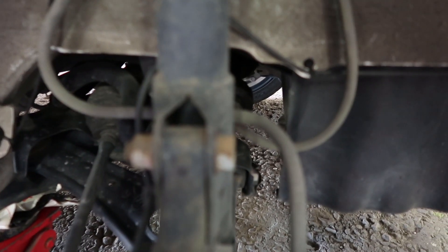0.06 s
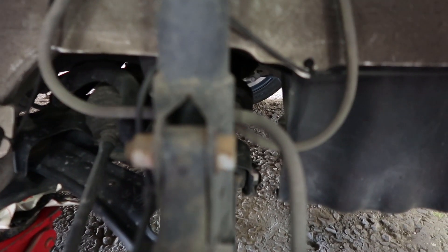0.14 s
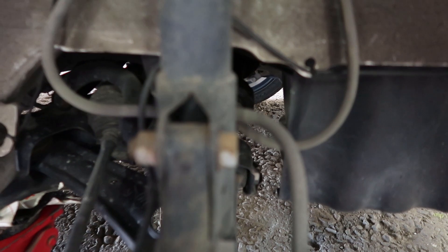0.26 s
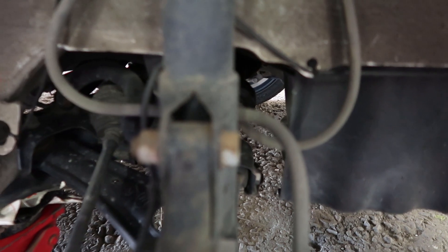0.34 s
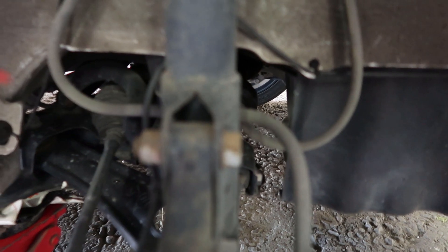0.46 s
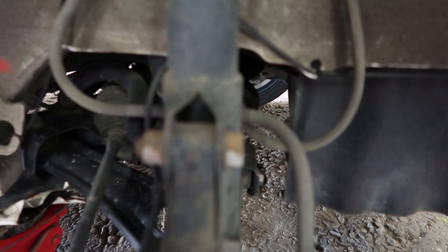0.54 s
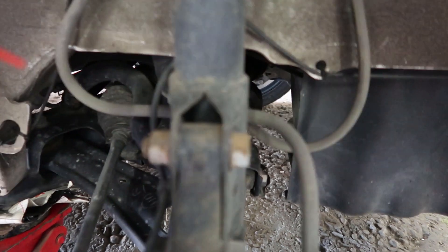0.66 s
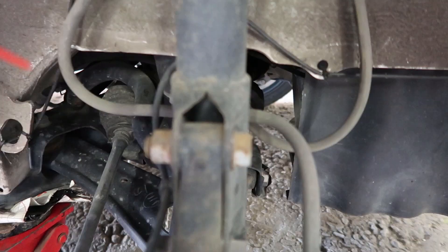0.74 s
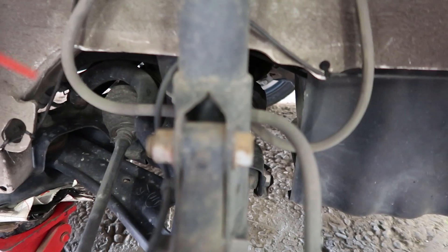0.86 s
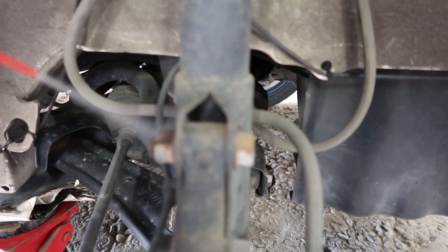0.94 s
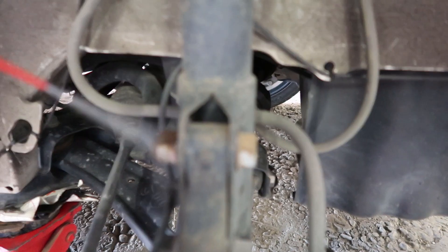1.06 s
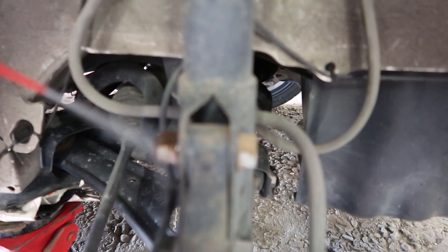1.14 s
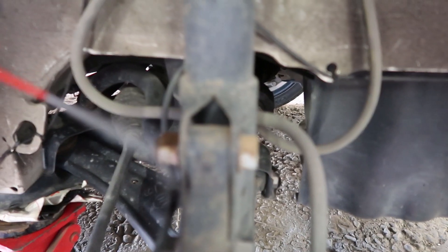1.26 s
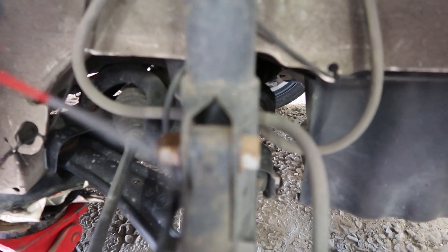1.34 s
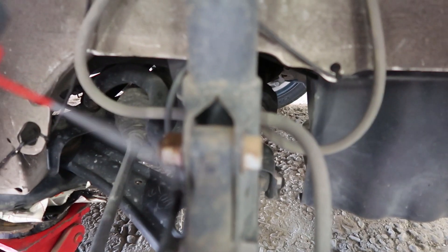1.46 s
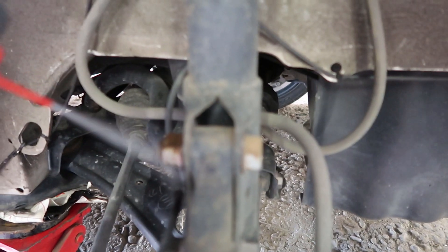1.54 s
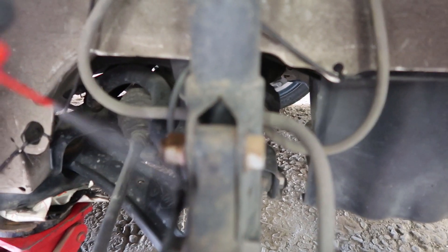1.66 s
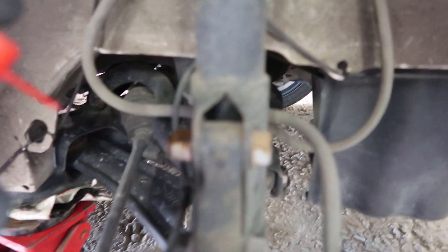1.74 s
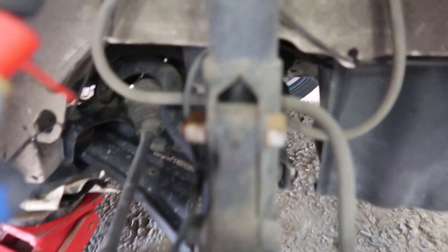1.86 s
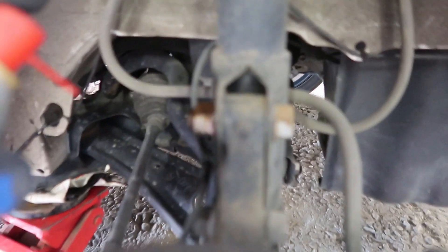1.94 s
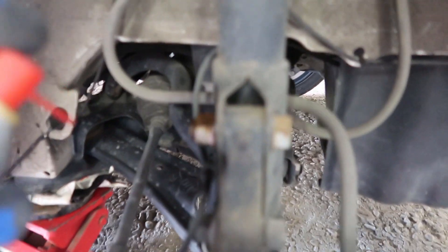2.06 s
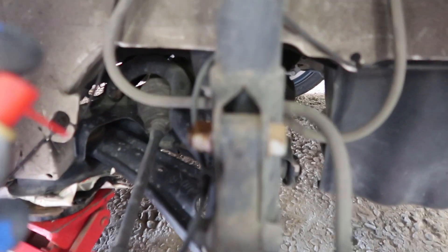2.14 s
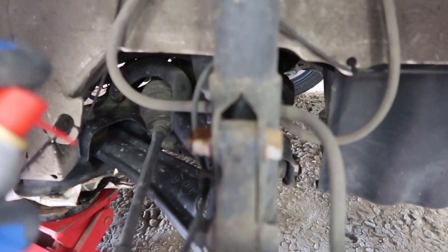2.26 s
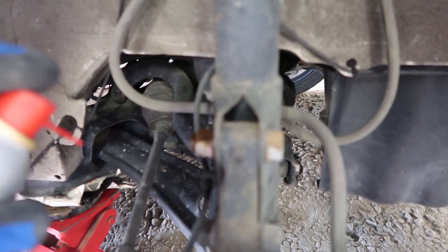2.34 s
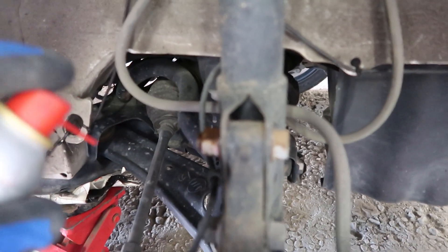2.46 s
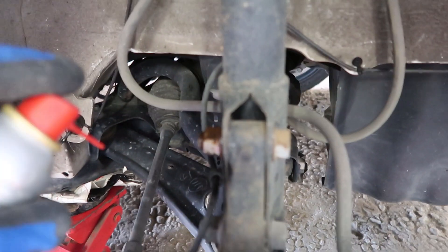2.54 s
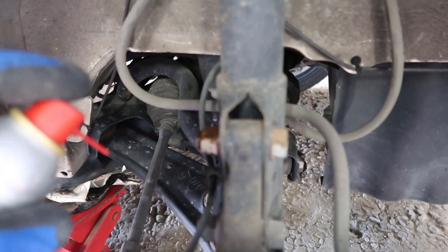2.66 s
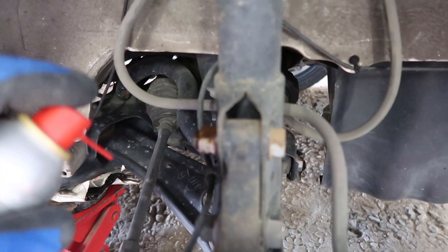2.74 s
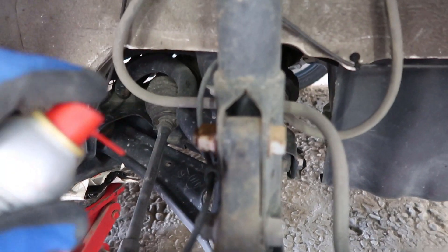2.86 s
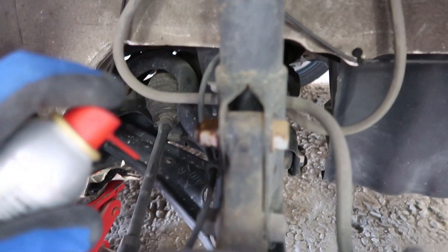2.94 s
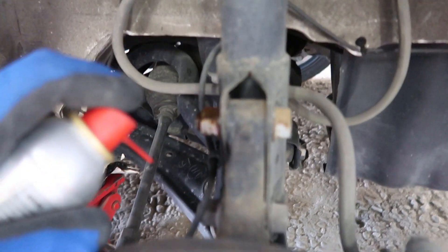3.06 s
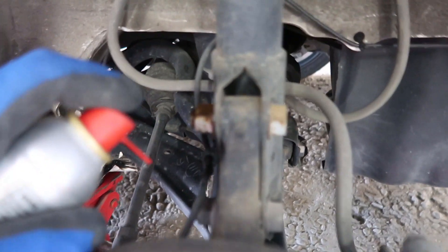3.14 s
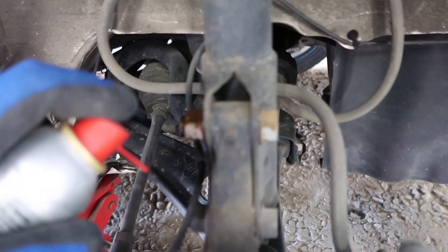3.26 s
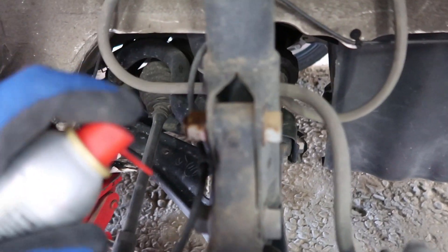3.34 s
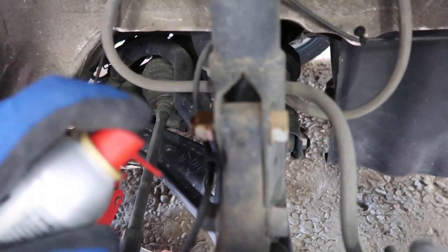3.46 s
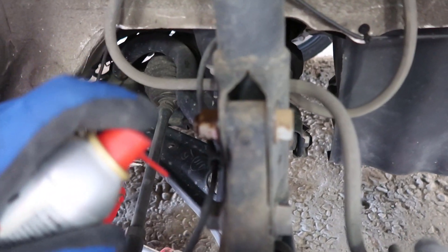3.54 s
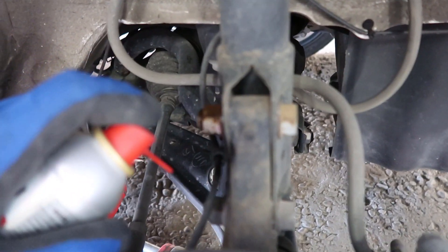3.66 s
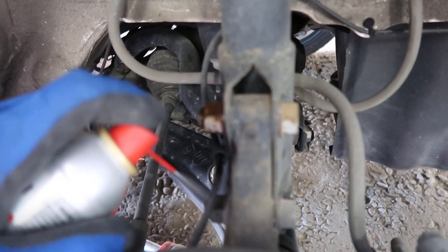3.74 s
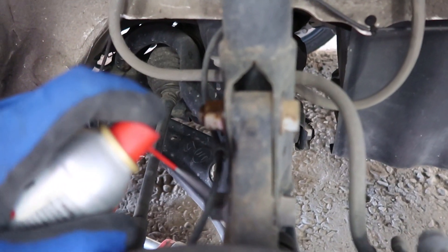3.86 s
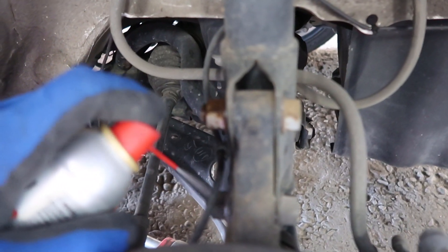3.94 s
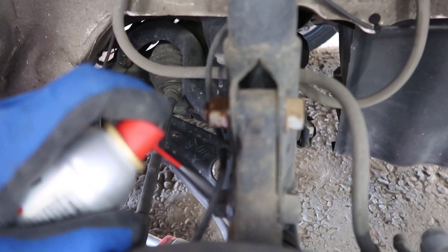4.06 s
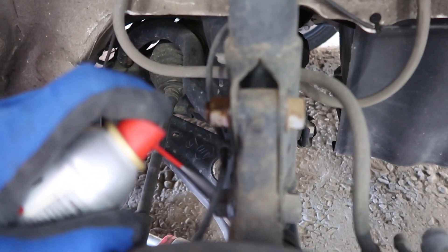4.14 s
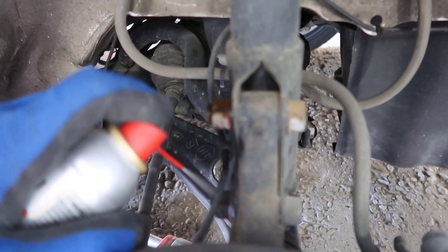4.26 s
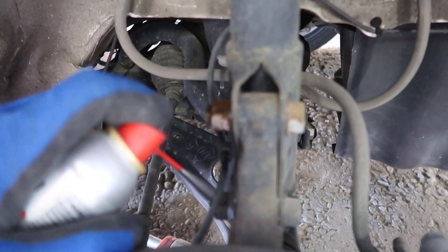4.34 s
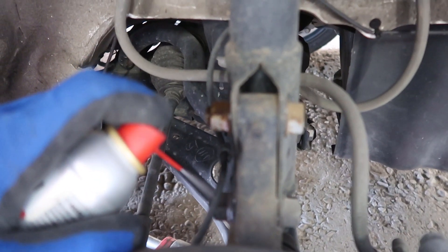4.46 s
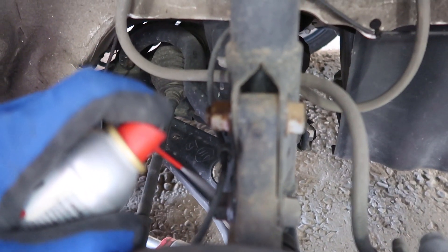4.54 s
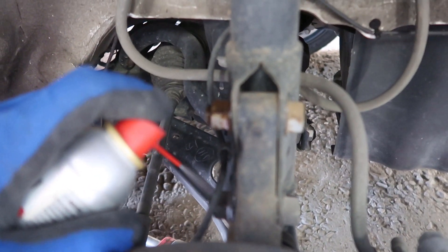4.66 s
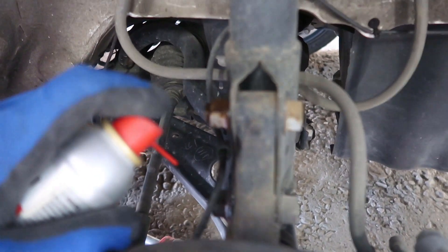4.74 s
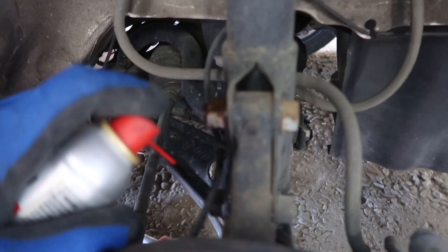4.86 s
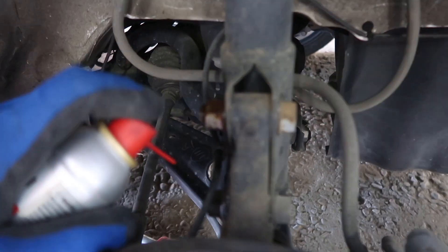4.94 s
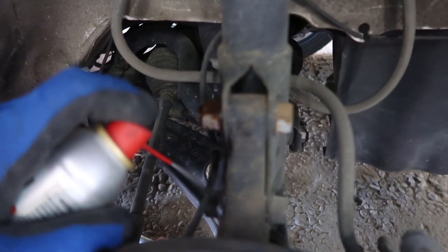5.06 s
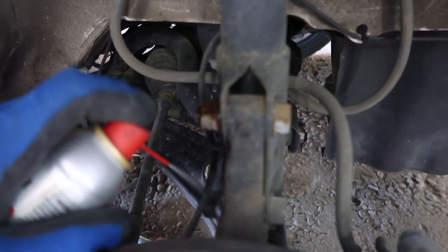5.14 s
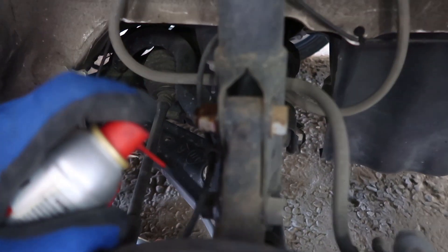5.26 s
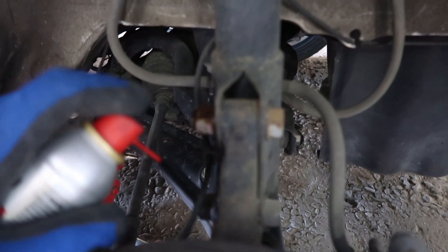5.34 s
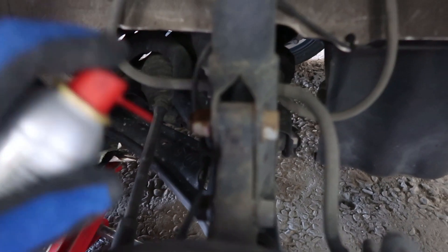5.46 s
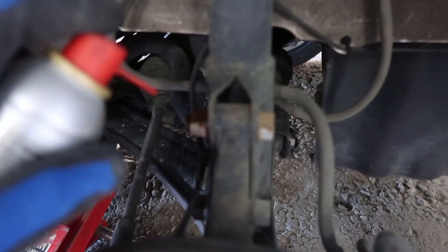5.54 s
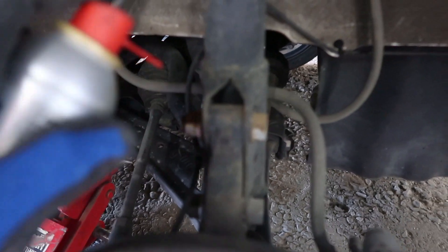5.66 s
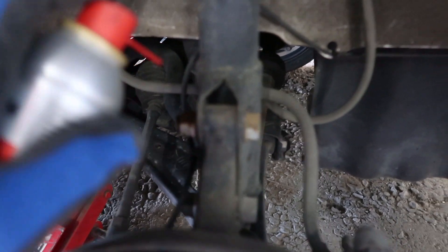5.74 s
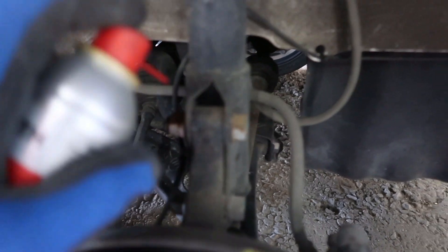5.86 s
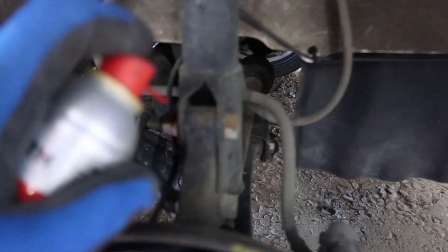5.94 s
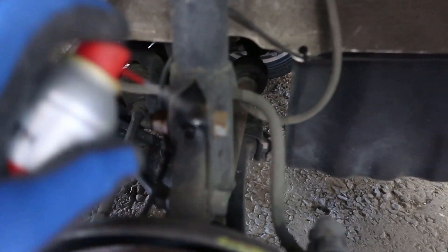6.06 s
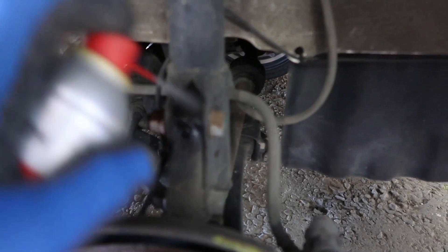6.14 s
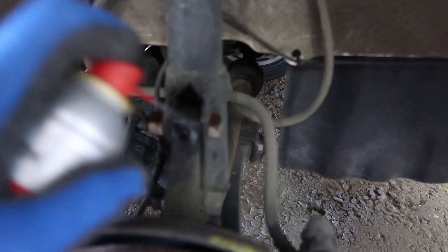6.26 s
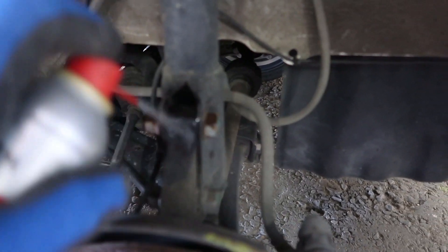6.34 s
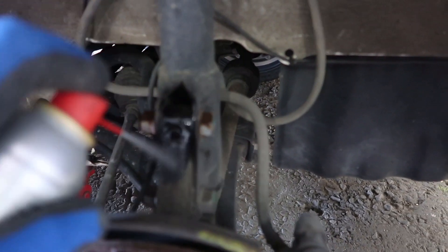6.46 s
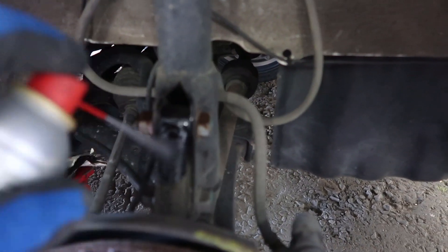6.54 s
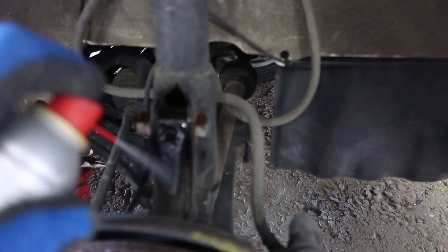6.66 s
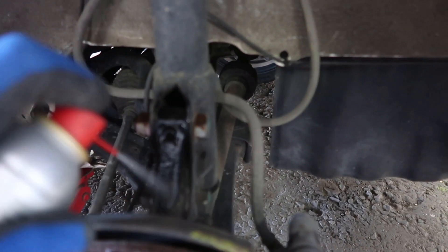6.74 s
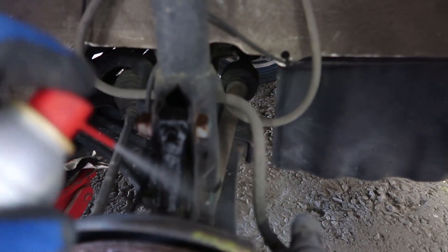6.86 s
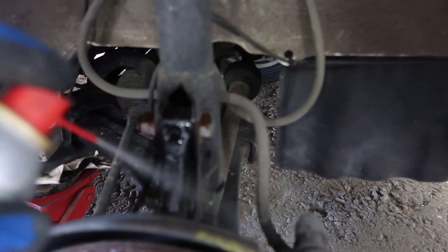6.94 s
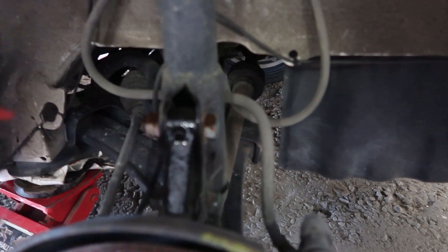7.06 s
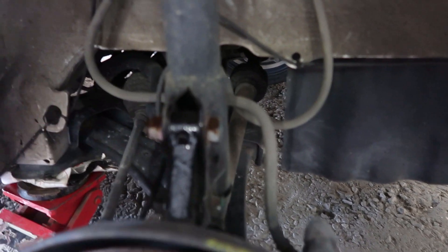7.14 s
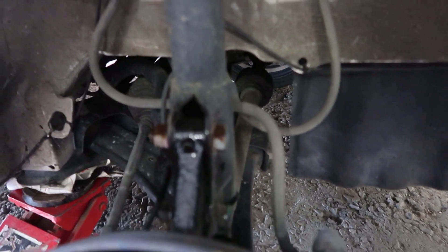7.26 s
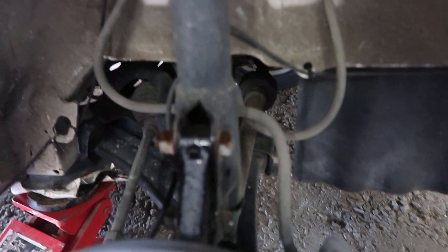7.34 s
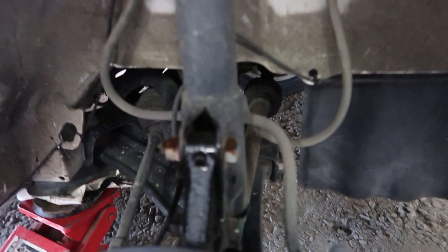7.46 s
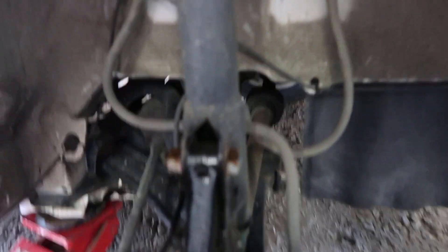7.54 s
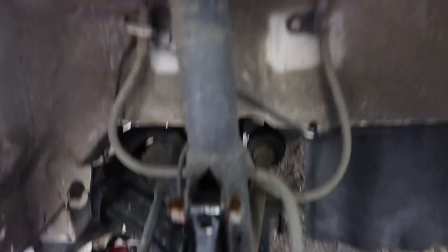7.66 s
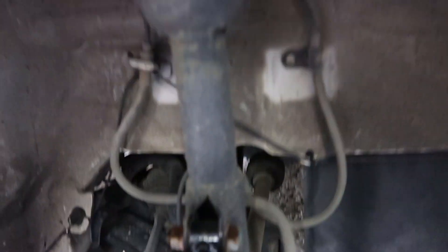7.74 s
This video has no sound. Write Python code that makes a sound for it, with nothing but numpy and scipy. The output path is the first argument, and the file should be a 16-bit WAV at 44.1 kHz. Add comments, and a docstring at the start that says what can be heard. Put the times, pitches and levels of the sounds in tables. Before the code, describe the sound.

A quiet outdoor or garage background runs throughout: a distant machine's low drone and wavering hum, a soft airy wash and a barely audible thin high whine. A small tick at 0.5 s precedes the first aerosol press at about 0.6 s; it starts as thin gas with brief high whistles, then fills by 1 s into a bright, wet hiss splashing on metal until 1.8 s. Background alone follows, with light can clicks at 3.2 and 3.7 s. A second steady spray, with a hollow resonance, lasts from 3.8 to 4.85 s. A short squirt comes at 5.1-5.4 s. A glove scrapes and scuffs on the can around 5.6-5.9 s. The last spray, 6.1-7.15 s, is uneven, dipping near 6.3 s and changing colour as the aim moves down the strut. Faint ticks and soft rubbing close it from 7.4 to 7.8 s. Close, dry stereo.

```python
"""An aerosol can with a straw sprays a car's suspension strut in four bursts, heard close by in the wheel arch.
Turbulence noise hisses in the jet and splashes on the metal, whose resonances colour it anew at each aim.
The valve whistles as narrow-band noise, the nozzle ticks and rings the can's modes, and a glove scrapes on it
between bursts. Behind, shaped noise makes a distant machine's drone, hum and rumble, a wash and a thin whine."""
import sys
import numpy as np
from scipy import signal
from scipy.fft import rfft, irfft, next_fast_len
from scipy.io import wavfile
from scipy.ndimage import uniform_filter1d, map_coordinates

SR = 44100
rng = np.random.default_rng(int(sys.argv[2]) if len(sys.argv) > 2 else 0)


def dump_mix(stems):
    """Bounce the given channels to the path in sys.argv[1] as a 16-bit WAV at rate SR."""
    frames = np.atleast_2d(stems).T  # one column per channel
    limited = np.clip(frames, -1, 1)  # hard clip at full scale
    pcm = np.round(limited * 32767).astype(np.int16)
    wavfile.write(sys.argv[1], SR, pcm)


N = 344421


def amp(db):
    """Logarithmic level: decibels to amplitude gain."""
    return 10 ** (np.asarray(db) / 20)


def unit(x):
    """Normalisation: x at rms 1."""
    return x / np.sqrt(np.mean(x ** 2) + 1e-20)


def clock():
    """Sampling: the time of each sample in seconds."""
    return np.arange(N) / SR


def along(points, hz):
    """Spectral envelope: (f/Hz, value) points read on a logarithmic frequency axis."""
    f, value = np.transpose(points)
    return np.interp(np.log(hz + 1), np.log(f + 1), value)


def level_curve(points, t):
    """Temporal envelope: (t/s, level/dB) points joined by straight lines."""
    s, level = np.transpose(points)
    return np.interp(t, s, level)


def swells(rows, t):
    """Superposition: the sum of Gaussian bumps (t/s, spread/s, level/dB)."""
    return sum(db * np.exp(-((t - s) / spread) ** 2 / 2) for s, spread, db in rows)


def wobble(rate, t):
    """Slow random modulation: a smooth curve with rate random knots a second."""
    knot = (t - t[0]) * rate
    return map_coordinates(rng.standard_normal(int(knot[-1]) + 4), [knot])


def filtered(x, response):
    """Linear filtering: x times a response of frequency, with padding against wrap-around."""
    n = x.shape[-1]
    m = next_fast_len(n + 4096)
    return irfft(rfft(x, m) * response(np.fft.rfftfreq(m, 1 / SR)), m)[..., :n]


def bell(hz, centre, width):
    """Resonance: a curve of height 1, width Hz across at half height."""
    return 1 / (1 + (2 * (hz - centre) / width) ** 2)


def band_unit(x, lo, hi):
    """Band level: a stereo pair scaled so that its centre has rms 1 between lo and hi Hz."""
    centre = x.mean(0)
    return x / np.std(filtered(centre, lambda hz: (hz > lo) & (hz < hi)))


def noise_pair(t, patchy_db):
    """Non-stationary noise: two unrelated noises with drifting time-frequency patches of gain."""
    cells = signal.stft(rng.standard_normal((2, len(t))), nperseg=512)[2]
    field = uniform_filter1d(rng.standard_normal(cells.shape), size=3, axis=1)
    field = uniform_filter1d(field, size=22, axis=2)
    return signal.istft(cells * amp(patchy_db * unit(field)), nperseg=512)[1][:, :len(t)]


def narrow(t, pitch_hz, width_hz, phase):
    """Narrow-band noise: slow noise modulates a carrier, with a phase step in radians between the ports.
    Its amplitude response has halved width_hz to either side of the pitch."""
    a, b = filtered(rng.standard_normal((2, len(t))), lambda hz: bell(hz, 0, width_hz * 2))
    carrier = 2 * np.pi * np.cumsum(pitch_hz * np.ones(len(t))) / SR
    turn = carrier + np.array([[phase], [-phase]]) / 2
    return unit(a * np.cos(turn) + b * np.sin(turn))


# coherence of a diffuse field between the two ports: f/Hz, left-right likeness (-1 to 1)
COHERENCE = [(30, .965), (70, .992), (160, .988), (350, .89), (1200, .88), (2200, .45), (3500, .1),
             (8000, 0), (14000, -.3)]


def diffuse(spectrum, patchy_db):
    """Diffuse field: stereo noise, alike in the bass and unrelated or opposed in the treble; its mid has rms 1."""
    def mid_and_side(hz):
        turn = np.arccos(np.clip(along(COHERENCE, hz), -1, 1)) / 2
        return amp(along(spectrum, hz)) * [np.cos(turn), np.sin(turn)]

    mid, side = filtered(noise_pair(clock(), patchy_db), mid_and_side)
    return np.array([mid + side, mid - side]) / np.std(mid)


# spectrum of the machine's low drone: f/Hz, level/dB
DRONE_SPECTRUM = [(12, -50), (20, -23), (75, 10), (91, 9.5), (113, 4), (130, -12), (170, -35), (290, -120)]
# its level in time: t/s, level/dB
DRONE_LEVEL_CURVE = [(0, -47.5), (0.75, -43.5), (1.35, -45), (1.6, -59), (2.45, -48.2), (3.1, -57),
                     (6.6, -59), (7.0, -46.5), (7.81, -46)]


def drone():
    """Band-limited noise with a narrow-band overtone: the distant machine's drone, rising and falling."""
    t = clock()
    overtone = amp(-5) * narrow(t, 155, width_hz=21, phase=0)
    return amp(level_curve(DRONE_LEVEL_CURVE, t)) * (diffuse(DRONE_SPECTRUM, patchy_db=-1.2) + overtone)


# spectrum of the rumble: f/Hz, level/dB
RUMBLE_SPECTRUM = [(62, -52), (105, -5), (151, 1.5), (183, -2.5), (232, 0.5), (286, -3), (345, -12.5),
                   (380, -19), (490, -32), (840, -120)]
# its level in time: t/s, level/dB
RUMBLE_LEVEL_CURVE = [(0, -43.5), (3.5, -46.5), (4.2, -47), (5.4, -48), (6.1, -44.5), (7.81, -47)]


def rumble():
    """Shaped diffuse noise: the machine's rumble, slowly varying in level."""
    return amp(level_curve(RUMBLE_LEVEL_CURVE, clock())) * diffuse(RUMBLE_SPECTRUM, patchy_db=-0.1)


# wavering tones of the machine: f/Hz, level/dB, half width/Hz
HUM_TONES = [(83.1, -53, 17), (160, -52.5, 27), (221.4, -53, 16), (926, -62, 17)]


def hum():
    """Narrow-band noise: tones whose finite bandwidth makes them waver."""
    t = clock()
    return sum(amp(db) * narrow(t, hz, width, phase=0) for hz, db, width in HUM_TONES)


# spectrum of the outdoor wash: f/Hz, level/dB
WASH_SPECTRUM = [(190, -26), (330, -12), (400, -5.5), (518, -0.5), (692, -7), (813, -5), (896, -8),
                 (971, -5), (1200, -5.5), (2000, -17.5), (3470, -22.5), (7630, -31.5), (12800, -37),
                 (14500, -46), (15500, -60)]
# level of the wash below its treble: t/s, level/dB
WASH_LEVEL_CURVE = [(0, -51.5), (0.5, -52), (1.9, -47.5), (2.6, -46), (3.2, -49.5), (3.7, -50),
                    (4.95, -50.5), (7.81, -50)]


def wash():
    """Spectral tilt with level: an outdoor wash of diffuse noise that swells mostly below the treble."""
    air = diffuse(WASH_SPECTRUM, patchy_db=1.0)
    body = filtered(air, lambda hz: 1 / (1 + (hz / 1600) ** 8))
    body_db = level_curve(WASH_LEVEL_CURVE, clock())
    treble_db = -49.0 + 0.29 * (body_db - body_db.mean())
    return amp(body_db) * body + amp(treble_db) * (air - body)


def whine():
    """Narrow-band noise: a thin, faint high tone."""
    return amp(-77.5) * narrow(clock(), 13010, width_hz=45, phase=2.0)


def garage():
    """Superposition of the background sources."""
    return drone() + rumble() + hum() + wash() + whine()


# spectrum of the glove's scrape: f/Hz, level/dB
SCRAPE_SPECTRUM = [(880, -41), (1500, -10), (3000, -4.5), (3890, -11), (4410, -14), (5670, -14),
                   (13000, -20), (15000, -31)]
# spectrum of the dull scuff under a hard grip: f/Hz, level/dB
SCUFF_SPECTRUM = [(900, -28), (1700, -2), (2300, 0), (3500, 0), (4500, -9), (6000, -18), (9000, -30)]
# strokes of the glove on the can: t/s, length/s, level/dB, scuff against the scrape/dB
GLOVE_STROKES = [(5.568, 0.22, -58.5, -16), (5.659, 0.015, -58.5, 9), (5.705, 0.025, -56.5, 6),
                 (5.745, 0.03, -56, 5.5), (5.832, 0.061, -59, -6), (7.37, 0.12, -65.5, -14),
                 (7.52, 0.26, -61.5, -14)]
GRIP_S, SLIP_S = 0.0099, 0.008  # linear rise and exponential decay time of a stroke


def glove():
    """Friction noise: the glove scrapes in short, uneven strokes; a hard grip adds a dull scuff."""
    t = clock()
    scrape, scuff = np.zeros(N), np.zeros(N)
    for s, length, db, scuff_db in GLOVE_STROKES:
        rise = np.clip((t - s) / GRIP_S, 0, 1)
        stroke = amp(db) * rise * np.exp(-np.maximum(t - s - length, 0) / SLIP_S)
        scrape += stroke
        scuff += stroke * amp(scuff_db)
    unevenness = amp(1.2 * wobble(130, t))
    scrape_sound = scrape * diffuse(SCRAPE_SPECTRUM, patchy_db=4.5)
    scuff_sound = scuff * diffuse(SCUFF_SPECTRUM, patchy_db=0.5)
    return unevenness * (scrape_sound + scuff_sound)


# the can's modes: f/Hz, level touched on the wall/dB, level touched on the rim/dB, t60/s
CAN_MODES = [(1910, -1, -14, 0.12), (3460, 0.5, -13, 0.25), (4167, -12, -1, 0.4), (4525, 0.5, -14, 0.32),
             (5350, 1, -1, 0.23), (5680, -8, -10, 0.19), (6089, -11, -12, 0.2), (7284, -12, 1, 0.1),
             (8245, -3, -12, .15)]
# ticks of the nozzle and can: t/s, level/dB, centre f/Hz, t60/s, ring level against the tick/dB,
# place touched (0 wall to 1 rim), treble level/dB
NOZZLE_TICKS = [(0.470, -48, 4400, 0.018, -26, 0, -30), (3.235, -46, 3900, 0.15, -10, 0, -8),
                (3.657, -55, 4800, .16, -8, 1, -9), (5.064, -43, 6000, .05, -18, 0, -10),
                (7.408, -54, 2600, .09, -20, 0, -22), (7.535, -57, 4400, 0.11, -17, 0, -16),
                (7.668, -55, 10000, .03, -20, 0, -17), (7.748, -44, 5660, 0.033, -22, 0, -28)]


def ticks():
    """Modal excitation: each tick rings the can faintly; the place touched decides which modes speak."""
    out = np.zeros((2, N))
    age = np.arange(SR // 4) / SR
    for s, db, centre, t60, ring_db, rim, treble_db in NOZZLE_TICKS:
        def colour(hz):
            main = bell(hz, centre, centre * 0.68) * hz / (hz + 900)
            return main + amp(treble_db) * bell(hz, 11400, 4000)

        tick = unit(filtered(rng.standard_normal((2, len(age))), colour))
        # each mode starts at a random phase, slightly different at the two ports
        phases = rng.uniform(0, 2 * np.pi, (len(CAN_MODES), 1, 1)) + rng.normal(0, 0.45, (len(CAN_MODES), 2, 1))
        ring = np.zeros((2, len(age)))
        for (hz, wall_db, rim_db, mode_t60), phase in zip(CAN_MODES, phases):
            mode_db = wall_db + rim * (rim_db - wall_db) - 60 * age / mode_t60
            ring += amp(mode_db) * np.sin(2 * np.pi * hz * age + phase)
        onset = 1 - np.exp(-age / (0.028 * t60))
        sound = amp(db) * onset * (tick * amp(-60 * age / t60) + amp(ring_db) * ring)
        place = out[:, round(s * SR):][:, :len(age)]
        place += sound[:, :place.shape[1]]
    return out


ATTACK_S = 0.021  # the straw fills
# brief whistles of the valve: t/s, spread/s, f/Hz, half width/Hz, level/dB, phase between ports/rad
VALVE_WHISTLES = [(0.63, 0.04, 3830, 281, -47, 1.0), (0.73, 0.085, 4500, 430, -44, 0.83),
                  (0.72, 0.053, 5630, 120, -48.5, 0.6), (0.838, 0.023, 7630, 290, -33.5, 1),
                  (0.73, 0.078, 7500, 420, -44, 1.2), (5.42, 0.03, 5770, 90, -53, 1.06),
                  (6.14, 0.033, 7880, 161, -43, 2.8)]


def whistles():
    """Flow-excited narrow-band noise: the valve sings briefly, faded in over ATTACK_S up to its cracking."""
    t = clock()
    out = np.zeros((2, N))
    for s, spread, hz, width, db, phase in VALVE_WHISTLES:
        cracks = max(press[0] for press in VALVE_PRESSES if press[0] < s + spread)
        opened = np.clip((t - cracks) / ATTACK_S + 1, 0, 1)
        swell = np.exp(-((t - s) / spread) ** 2 / 2) * opened
        out += amp(db) * swell * narrow(t, hz, width, phase)
    return out


CRACK_DB, SEAT_DB = -10, -12  # flow as the valve cracks open and just before it seats, against full flow
# the finger falters or bears down: t/s, spread/s, flow level/dB
FINGER_FALTERS = [(0.83, 0.024, 1.5), (0.912, 0.031, -4), (3.85, 0.025, -1.5), (5.11, 0.025, 1),
                  (6.15, 0.018, 0), (6.3, 0.071, -5), (7.135, 0.018, -1)]


def valve(t, cracks, full, eases, shuts, empties):
    """Flow control: the valve cracks, opens, holds, eases and shuts; returns flow in dB and the straw's gate."""
    flow_db = np.interp(t, [cracks, full, eases, shuts], [CRACK_DB, 0, 0, SEAT_DB])
    flow_db = flow_db + swells(FINGER_FALTERS, t)
    filling = np.clip((t - cracks) / ATTACK_S + .5, 0, 1)
    emptying = amp(-40 * np.maximum(t - shuts, 0) / empties)
    return flow_db, filling * emptying


FIRST_BOUNCE_S = 0.003  # delay of the nearest wall's answer


def near_walls(source, t, t60, drift, count=5):
    """Multiple reflection: many short bounces on two outputs; their mix drifts with drift knots a second."""
    age = np.arange(SR // 20) / SR
    decay = amp(-60 * age / t60) * (age > FIRST_BOUNCE_S)
    paths = rng.standard_normal((count, 2, len(age))) * decay
    paths /= np.linalg.norm(paths, axis=2, keepdims=True)
    weights = np.array([wobble(drift, t) for _ in range(count)])
    weights /= np.linalg.norm(weights, axis=0)
    bounced = signal.fftconvolve(source[None, None], paths, axes=2)[..., :len(t)]
    return (weights[:, None] * bounced).sum(0)


# the unsteady hand: knots a second, share of each resonance's pitch, share of its lift
WANDER_RATE, WANDER_SHARE, SWAY_SHARE = 6.01, 0.0048, 0.12


def wandering(modes, hz, when):
    """Time-varying resonance: the lift in dB of modes that each waver in pitch and strength."""
    def vary(share):
        return 1 + share * wobble(WANDER_RATE, when)

    return sum(db * vary(SWAY_SHARE) * bell(hz, centre * vary(WANDER_SHARE), width)
               for centre, width, db in modes)


# bands that come and go as the aim moves:
# t/s, spread/s, f/Hz, glide/(Hz/s), width/Hz, common level/dB, opposed level/dB
PASSING_BANDS = [(0.8, 0.11, 5400, 0, 300, -21, -10), (0.75, 0.16, 6130, 0, 450, -7, -7),
                 (0.86, 0.056, 3450, 0, 250, -6, 0), (0.76, 0.15, 12000, 2, 2500, 0.5, 2),
                 (0.78, 0.13, 11030, 2, 220, 3, 9), (0.75, 0.15, 13300, 0, 900, -2, -6),
                 (0.75, 0.15, 9300, 0, 700, -3.5, -6), (1.14, 0.12, 2200, 0, 700, 4, -8),
                 (1.22, 0.22, 12180, -6000, 450, -1.5, 5), (3.9, 0.23, 8500, 400, 300, 6, 0),
                 (3.962, 0.06, 2820, 0, 200, 4.5, 0), (4.68, 0.08, 2850, 0, 800, -2, -13),
                 (5.2, 0.02, 2810, -7, 220, 9, 0), (6.146, 0.032, 2120, 0, 280, 3, 0),
                 (6.33, 0.057, 4240, 0, 1600, 0.5, -3), (6.448, 0.017, 4500, 0, 900, 8, 2),
                 (6.503, 0.14, 1870, -3, 350, 2.5, -11), (6.507, 0.066, 10950, 0, 450, 6, -3),
                 (6.83, 0.04, 1930, 0, 250, 7.5, 0), (6.78, 0.09, 8300, 0, 250, 10, 1),
                 (6.95, 0.21, 10550, 400, 380, 4, 0)]


def turbulence(t, colour, gaps, across, drift, share, echo):
    """Turbulence noise through resonators: one share of the spray, coloured by metalwork that shifts with the hand."""
    colour = np.array(colour)
    direct, stray = noise_pair(t, patchy_db=0.8)
    bounced = near_walls(direct, t, t60=0.034, drift=drift)
    # the same noise reaches both ports by different paths, which cuts fine notches in it
    pair = np.array([unit(direct + echo * bounced[0]), unit(bounced[1] + 0.67 * stray)])
    hz, when, cells = signal.stft(pair, SR, nperseg=1024, noverlap=768)
    hz, when = hz[:, None], when + t[0]
    common_db = along(colour[:, [0, 1]], hz) + wandering(gaps, hz, when)
    opposed_db = along(colour[:, [0, 2]], hz) + wandering(across, hz, when)
    for s, spread, centre, glide, width, common_lift, opposed_lift in PASSING_BANDS:
        passing = np.exp(-((when - s) / spread) ** 2 / 2)
        band = passing * bell(hz, centre + glide * (when - s), width)
        common_db = common_db + common_lift * band
        opposed_db = opposed_db + opposed_lift * band
    cells = cells * amp([common_db, opposed_db]) * share(hz)
    mid, side = signal.istft(cells, nperseg=1024, noverlap=768)[1][:, :len(t)]
    return np.array([mid + side, mid - side])


SPLASH_GROWS = 1.09  # dB of splash for each dB of flow
GAS_ONLY_DB, WETTING_S = -12, 0.026  # splash before the liquid arrives, and how fast it comes in
SAG_HZ_PER_S = 75  # the hollow's pitch sinks during a press
BODY_GROWS = 0.17  # dB of the splash's low end for each dB of the hollow
HOLLOW_SPUTTER_DB, HOLLOW_SPUTTER_RATE = 3, 55  # the hollow speaks in spurts: depth, knots a second
# the jet strikes an edge or slips past it: t/s, spread/s, splash level/dB
JET_GLANCES = [(1.08, 0.056, 2.5), (3.95, 0.019, 1.5), (5.135, 0.025, 1), (5.2, 0.016, 1),
               (6.15, 0.024, 3.5), (6.235, 0.012, 0.5), (6.34, 0.038, -6.5), (6.44, 0.017, 2),
               (6.68, 0.035, 2.5), (6.77, 0.033, -2), (6.838, 0.013, 2.5), (6.90, 0.0095, -3.5),
               (7.0, 0.029, -4)]


def burst(press, aim, colour, gaps, across, jet_db, splash_db, split_hz, sputter_db, drift):
    """Jet and impact noise: the jet makes the treble; its splash makes the mid range and sounds the hollow."""
    cracks, wets, full, eases, shuts, empties = press
    aimed, leaves, pitch_hz, hollow_db, off_aim, width_hz = aim
    now = clock()
    pressed = (now >= cracks - ATTACK_S) & (now <= shuts + 2 * empties)
    t = now[pressed]
    flow_db, gate = valve(t, cracks, full, eases, shuts, empties)
    dryness = (1 - np.tanh((t - wets) / WETTING_S / 2)) / 2
    hollow_lift = hollow_db - off_aim * np.abs(np.minimum(t, shuts) - aimed)

    def low(hz):
        return 1 / (1 + (hz / split_hz) ** 20)

    def jet_share(hz):
        return np.sqrt(1 - low(hz))

    def splash_share(hz):
        return np.sqrt(low(hz)) * hz ** 2 / (hz ** 2 + 330 ** 2)

    jet = band_unit(turbulence(t, colour, gaps, across, drift, jet_share, echo=0.61), 6500, 14500)
    splash = band_unit(turbulence(t, colour, gaps, across, drift, splash_share, echo=0.59), 1550, 3300)
    hollow = narrow(t, pitch_hz - SAG_HZ_PER_S * (t - aimed), width_hz, phase=0)
    spurts = amp(HOLLOW_SPUTTER_DB * np.tanh(wobble(HOLLOW_SPUTTER_RATE, t)))
    in_reach = (1 - np.tanh((t - leaves) / WETTING_S)) / 2
    hollow = hollow * spurts * in_reach * amp(hollow_lift)
    # the deeper the jet reaches into the hollow, the fuller the splash's low end
    body = filtered(splash, lambda hz: 1 / (1 + (hz / 1350) ** 8))
    depth_db = hollow_lift - np.average(hollow_lift, weights=gate)
    splash = splash + body * (amp(BODY_GROWS * depth_db) - 1)
    # liquid and gas leave the straw in uneven slugs
    slugs = sputter_db * (wobble(44.2, t) + 0.59 * wobble(260, t))
    impact_db = splash_db + SPLASH_GROWS * flow_db + GAS_ONLY_DB * dryness + swells(JET_GLANCES, t)
    sound = jet * amp(jet_db + flow_db + slugs / 2)
    sound += (splash + hollow) * amp(impact_db + slugs)
    out = np.zeros((2, N))
    out[:, pressed] = sound * gate
    return out


# presses of the nozzle: valve cracks t/s, liquid arrives t/s, fully open t/s, finger eases t/s,
# valve shuts t/s, time for the emptying straw to fall 40 dB/s
VALVE_PRESSES = [(0.583, 0.955, 1.05, 1.70, 1.835, 0.051), (3.793, 3.80, 3.885, 4.725, 4.845, 0.055),
                 (5.061, 5.075, 5.15, 5.265, 5.385, 0.095), (6.087, 6.10, 6.135, 7.07, 7.16, 0.07)]
# the jet crosses the strut's hollow once a press: best aim t/s, leaves it t/s, f/Hz,
# level against the splash/dB, loss off aim/(dB/s), half width/Hz
HOLLOW_CROSSINGS = [(1.619, 1.75, 1282, 0.5, 25, 115), (4.42, 4.807, 1366, 2.6, 9.5, 60),
                    (5.26, 5.343, 1360, 4, 128, 60), (6.698, 7.12, 1355, -11.5, -1, 67)]
# broad colour of the spray at each aim: f/Hz, level common to both ports/dB, level opposed between them/dB
AIM_1_COLOUR = [(500, -6.5, -17), (980, -1, -11), (1470, -6, -13), (2620, -0.5, -40), (3820, -9.5, -15.5),
                (5500, -16.5, -6.5), (8000, -19, -6.5), (10950, -6.5, -1), (13900, -5, 1.5),
                (15500, -19, -11)]
AIM_2_COLOUR = [(580, -6, -19), (920, 3.5, -8), (1530, 1.5, -33), (2630, -10, -20), (4000, -1.5, -27),
                (5500, -2.5, -5.5), (8000, -5.5, 0.5), (11000, -8.5, -4), (13960, -6.5, -4.5),
                (15400, -24, -2)]
AIM_3_COLOUR = [(560, -5.5, -15), (920, 2, -10), (1510, 1, -19), (2600, -9.5, -39), (4000, -4.5, -16),
                (5500, -5, -6), (8000, -5.5, -0.5), (11000, -6.5, -11), (13800, -6.5, 3), (15500, -26, -8)]
AIM_4_COLOUR = [(560, -0.5, -21), (880, 0.5, -13), (1520, -6.5, -23), (2610, -5, -21), (3940, 0, -7.5),
                (5500, -0.5, -3.5), (8000, -3, -2), (11000, -4, 2.5), (13800, -2.5, 0), (15500, -9, -6)]
# resonances of the gaps around the strut at each aim: f/Hz, width/Hz, mean lift/dB
AIM_1_GAPS = [(1780, 180, 14), (2755, 170, 8.5), (3155, 300, 6.5), (3870, 150, 11), (4530, 520, 11.5),
              (4950, 380, 15), (5720, 260, 12.5), (6100, 490, 12.5), (6760, 520, 14.5), (7500, 310, 15),
              (7870, 450, 15), (8560, 450, 14), (9420, 400, 9.5), (10160, 400, 10.5), (11250, 250, 3),
              (12300, 570, 7.5), (13000, 200, 4), (14450, 400, 5)]
AIM_2_GAPS = [(1745, 61, 8.9), (2130, 260, 10.3), (2784, 140, 7), (2930, 810, 9.9), (3460, 150, 4.5),
              (4230, 100, 10), (6420, 560, 4.5), (7350, 660, 5), (8820, 320, 9.9), (9140, 180, 6),
              (10550, 300, 6.3), (10900, 220, 8.1), (11500, 200, 5), (11940, 200, 6.2), (12750, 750, 6.3),
              (14140, 300, 8)]
AIM_3_GAPS = [(2120, 430, 10), (2800, 170, 11.7), (3270, 730, 9.8), (4210, 150, 11), (5460, 120, 6),
              (6340, 350, 8.6), (7110, 290, 8.8), (8860, 80, 6.4), (9100, 130, 7.8), (9920, 90, 6.3),
              (11000, 300, 7), (13270, 600, 4.5)]
AIM_4_GAPS = [(1860, 350, 15.2), (2326, 180, 10), (2626, 220, 12.2), (3520, 500, 6), (4830, 200, 6),
              (5800, 160, 6.1), (6290, 100, 4.9), (6850, 120, 6.6), (7400, 170, 6.1), (8100, 140, 5),
              (9000, 140, 3.4), (9550, 90, 6), (10550, 570, 5), (12200, 600, 5.4)]
# resonances across the arch, in opposite phase at the ports: f/Hz, width/Hz, mean lift/dB
AIM_1_ACROSS = [(3750, 200, 11), (4170, 200, 8), (5230, 100, 9), (7000, 600, 9), (7600, 600, 4),
                (8620, 440, 8), (9310, 420, 6), (10150, 130, 9), (13000, 150, 11)]
AIM_2_ACROSS = [(4420, 300, 20), (5110, 300, 8), (5900, 310, 4.5), (8000, 120, 6), (9930, 200, 8),
                (12300, 600, 12.5), (13440, 130, 8), (13960, 120, 12)]
AIM_3_ACROSS = [(5100, 200, 8), (6040, 300, 8.3), (8050, 190, 10), (9850, 600, 11), (11110, 170, 11),
                (11570, 200, 14), (12440, 150, 10)]
AIM_4_ACROSS = [(3100, 600, 9), (6360, 90, 5), (6970, 110, 5), (11450, 120, 4)]


def spray():
    """Source and filter: four presses, each aim with its own resonances; the echoes drift faster at each press."""
    first = burst(VALVE_PRESSES[0], HOLLOW_CROSSINGS[0], AIM_1_COLOUR, AIM_1_GAPS, AIM_1_ACROSS,
                  jet_db=-35.5, splash_db=-35.5, split_hz=4120, sputter_db=1.04, drift=2.17)
    second = burst(VALVE_PRESSES[1], HOLLOW_CROSSINGS[1], AIM_2_COLOUR, AIM_2_GAPS, AIM_2_ACROSS,
                   jet_db=-36, splash_db=-36.5, split_hz=3700, sputter_db=0.4, drift=2.98)
    third = burst(VALVE_PRESSES[2], HOLLOW_CROSSINGS[2], AIM_3_COLOUR, AIM_3_GAPS, AIM_3_ACROSS,
                  jet_db=-36.5, splash_db=-37.0, split_hz=3600, sputter_db=1.7, drift=4.8)
    fourth = burst(VALVE_PRESSES[3], HOLLOW_CROSSINGS[3], AIM_4_COLOUR, AIM_4_GAPS, AIM_4_ACROSS,
                   jet_db=-37.5, splash_db=-36.5, split_hz=3460, sputter_db=1.54, drift=7.47)
    return first + second + third + fourth


def scene():
    """Superposition at the two microphone ports; a level difference sets the can a little to the left."""
    can = glove() + ticks() + whistles() + spray()
    balance_db = [[.1], [-.1]]
    return garage() + can * amp(balance_db)


TOP_HZ = 15650  # upper band limit


def record(dry):
    """Band limitation: a very steep low-pass at TOP_HZ."""
    return filtered(dry, lambda hz: 1 / (1 + (hz / TOP_HZ) ** 300))


dry = scene()
out = record(dry)
dump_mix(out)
```